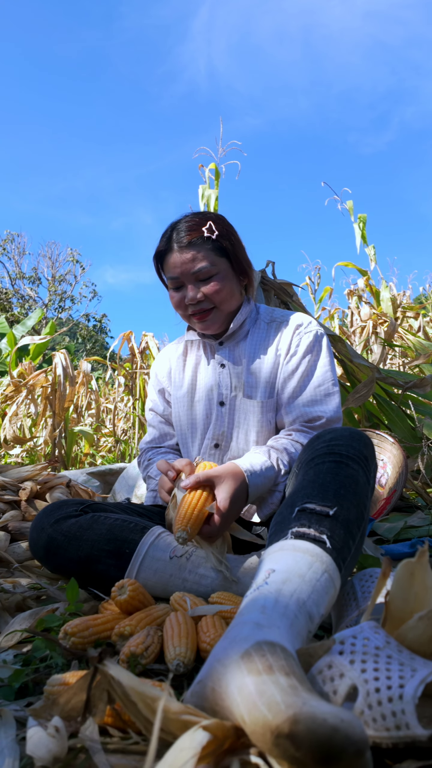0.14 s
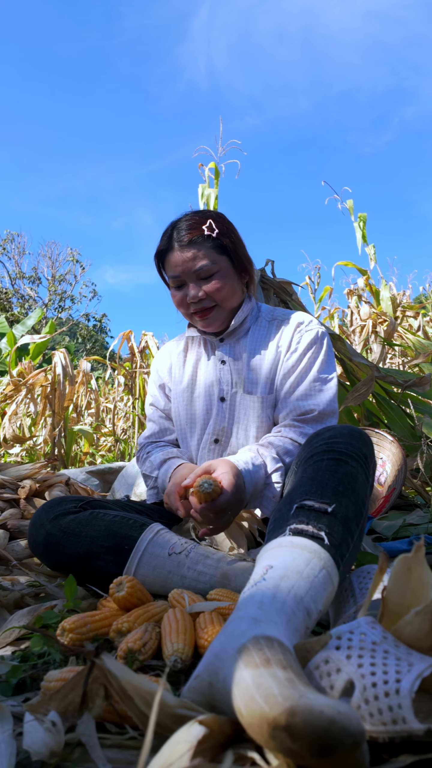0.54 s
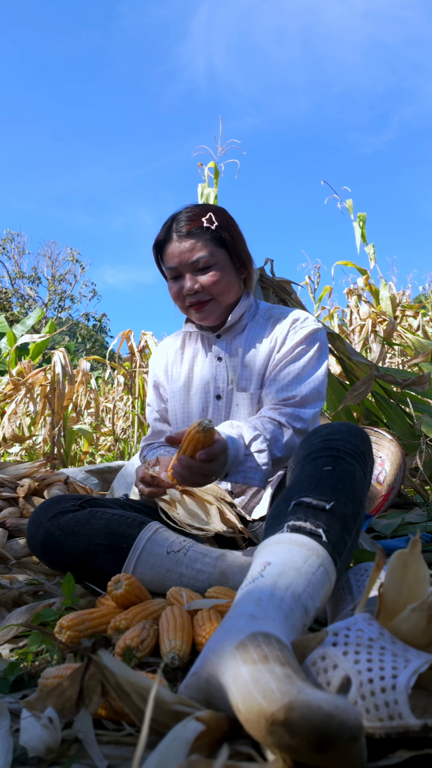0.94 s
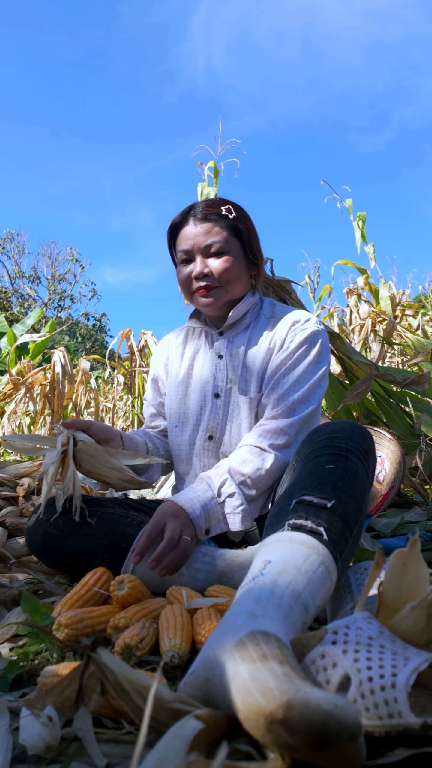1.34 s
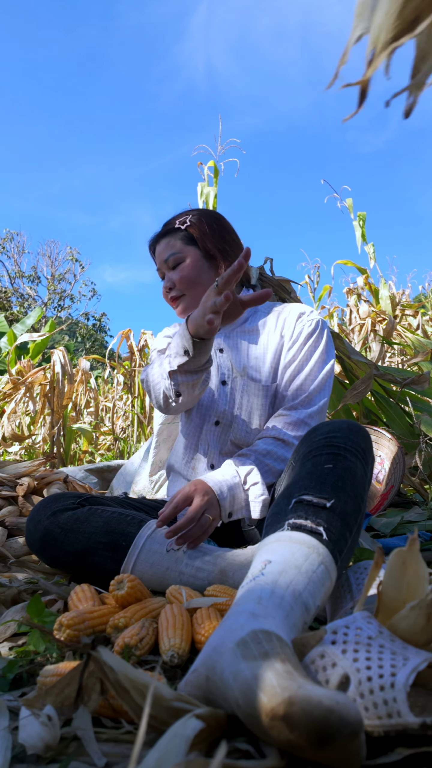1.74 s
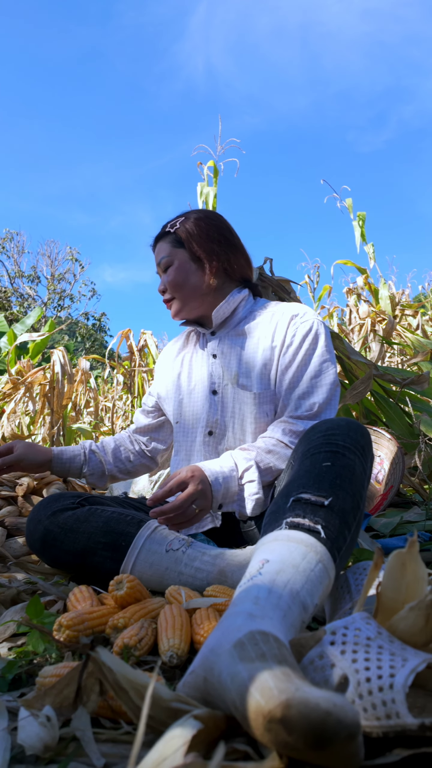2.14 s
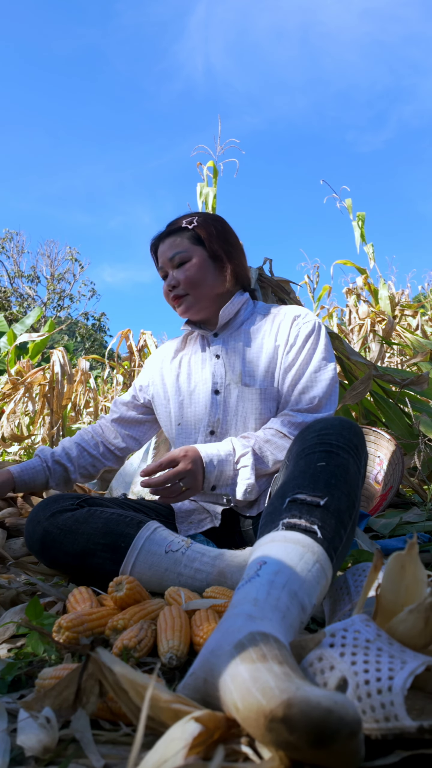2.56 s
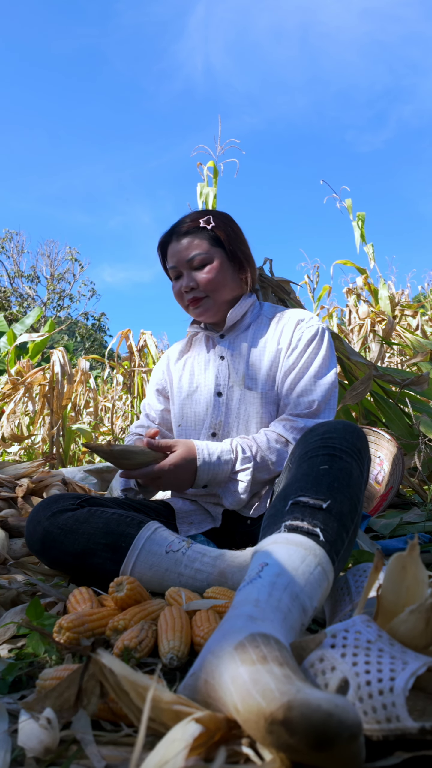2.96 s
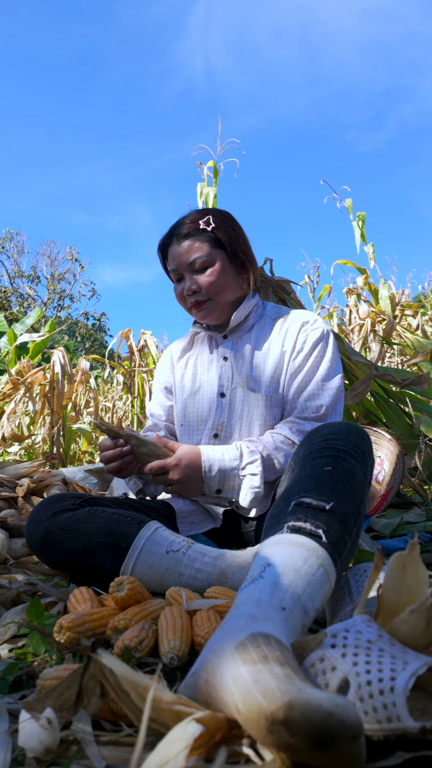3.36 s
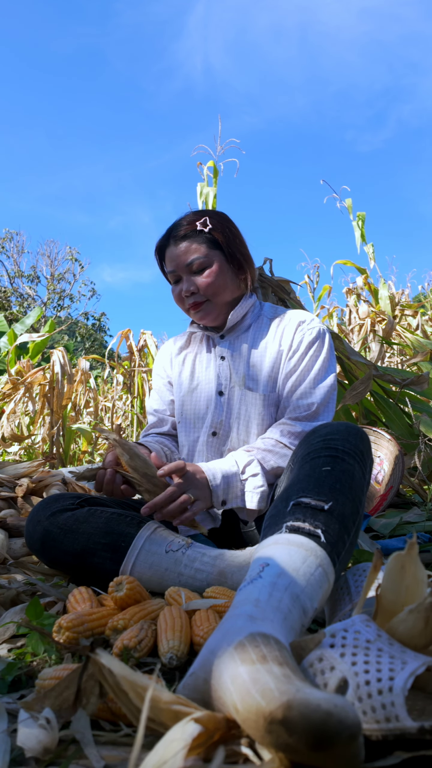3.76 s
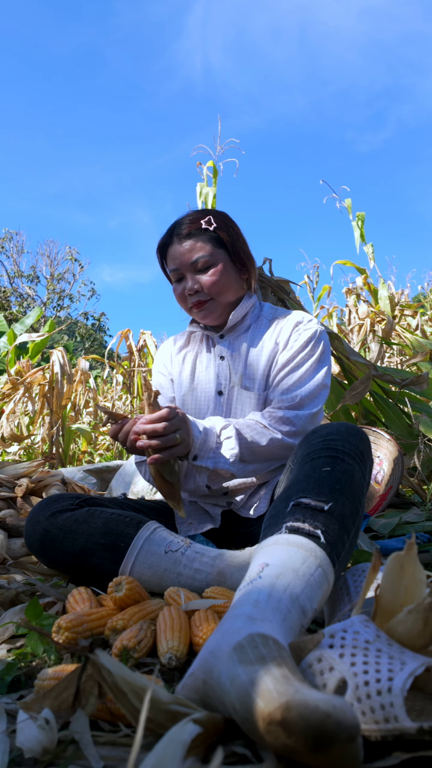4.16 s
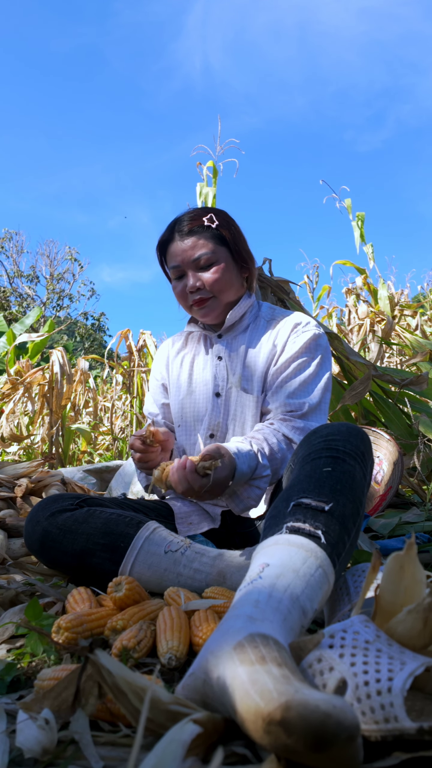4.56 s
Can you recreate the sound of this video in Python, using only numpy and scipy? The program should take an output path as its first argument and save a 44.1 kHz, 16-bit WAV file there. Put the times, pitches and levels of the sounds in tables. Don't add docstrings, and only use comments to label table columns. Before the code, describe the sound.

Hands strip papery leaves from corn ears outdoors, brittle crackles and sharp snaps over faint cricket chirps, airy hiss and distant low rumble.

```python
import sys
import numpy as np
from scipy import signal
from scipy.fft import rfft, irfft
from scipy.io import wavfile
from scipy.ndimage import uniform_filter1d

SR = 44100
rng = np.random.default_rng(int(sys.argv[2]) if len(sys.argv) > 2 else 0)


def dump(signal):
    limited = np.clip(np.atleast_2d(signal).T, -1, 1)
    pcm = np.round(limited * 32767).astype(np.int16)
    wavfile.write(sys.argv[1], SR, pcm)


def attenuation_scalar(level_db):
    decades = np.asarray(level_db, float) / 20
    return 10 ** decades


N = 207490

# peak_s, level_db, rise_s, fall_s, fine_fibres_db
GRIP_STROKES = [(0.002, -45, 0.023, 0.043, -2.5), (.07, -53, 0.092, 0.1, 1.5),
                (.122, -43.5, 0.012, 0.011, -2), (.145, -51, 0.02, 0.01, -3), (.22, -57, 0.046, 0.03, -0.5),
                (.345, -51, 0.1, 0.044, -2), (.443, -54.5, 0.0067, 0.15, -17), (.54, -56, 0.063, 0.77, -4),
                (.755, -51, 0.75, 0.018, -0.5), (.835, -64, .08, 0.026, -9),
                (.853, -42.5, 0.0047, 0.038, 4.5), (.877, -47, .008, .015, -10),
                (.901, -41.5, 0.018, .02, -5), (.92, -50, 0.013, 0.019, -3), (.955, -52.5, .08, 0.017, -1),
                (1.015, -55, 0.051, 0.06, 1.5), (1.169, -56, 0.01, 0.037, -21),
                (1.263, -59, 0.084, 0.19, 2), (1.305, -53, .004, 0.036, -9),
                (1.345, -56.5, 0.099, 0.12, 1.5), (1.385, -59, .02, 0.035, -3),
                (1.405, -55, 0.063, 0.018, -4), (1.578, -55.5, 0.021, 0.083, -1),
                (1.73, -56.5, 0.063, 0.099, 2.5), (1.52, -62.5, 0.027, 0.078, 2),
                (1.89, -63.5, 0.028, 0.1, 5.5), (3.695, -38, 0.037, 0.0099, 1), (3.71, -49, .02, .02, -1),
                (3.723, -46, .004, 0.035, -1), (3.75, -47.5, 0.066, 0.013, 4), (3.87, -59, 0.17, 0.026, 2),
                (4.21, -60.5, .02, 0.047, 6), (4.56, -57, 0.014, 0.033, 1.5)]
# peak_s, level_db, rise_s, fall_s, fine_fibres_db
TEAR_STROKES = [(1.365, -41.5, 0.019, 0.026, -5.5), (2.027, -38.5, 0.0013, 0.047, 4),
                (2.051, -38.5, 0.021, .011, -8), (2.075, -43, 0.025, .03, 1),
                (2.095, -35, 0.022, 0.077, -2), (2.122, -38, 0.0083, 0.036, -3.5),
                (2.15, -50, .03, 0.084, -3), (2.17, -57, 0.02, 0.3, 2), (2.2, -47.5, 0.04, 0.066, 3.5),
                (2.25, -46.5, 0.11, 0.066, 1), (2.47, -52, 0.1, 0.075, 2), (2.55, -63.5, 0.07, 0.15, 1),
                (2.69, -56.5, 0.024, 0.066, 11.5), (2.735, -65, 0.1, 0.016, 16.5),
                (2.828, -68, 0.03, 0.13, 9.5), (3.024, -66.5, 0.0059, 0.27, 3),
                (3.388, -69, 0.056, 0.011, 10), (3.432, -63, 0.018, 0.053, 6),
                (3.61, -62.5, 0.12, 0.035, 8.5), (3.659, -37, 0.002, 0.065, 4),
                (3.676, -26, 0.015, 0.0081, 8.5), (3.928, -49, 0.046, 0.041, 2),
                (4.044, -61.5, 0.08, 0.43, 1), (4.312, -47, 0.031, .011, 0),
                (4.326, -41.5, 0.0059, 0.096, 0.5), (4.355, -39.5, 0.025, 0.017, 3),
                (4.371, -35, 0.02, 0.031, 2.5), (4.386, -37, 0.014, .04, 1), (4.43, -43, 0.063, 0.027, 0),
                (4.452, -45, .02, 0.013, 2), (4.475, -45.5, 0.032, .03, -1), (4.502, -37, 0.025, 0.012, 0),
                (4.517, -37.5, 0.014, 0.021, 2), (4.537, -51, .006, 0.0096, 8),
                (4.704, -53.5, 0.032, .02, 4)]
# peak_s, level_db, rise_s, fall_s
FOLD_STROKES = [(.5, -58.5, 0.019, 0.023), (.92, -52, 0.037, 0.0098), (1.368, -56, 0.013, 0.012),
                (1.585, -66.5, .006, 0.097), (1.72, -64.5, 0.047, 0.065), (2.036, -44.5, 0.0069, 0.029),
                (2.31, -61.5, 0.059, 0.063), (2.43, -62, 0.012, 0.023), (4.312, -56, 0.039, 0.021)]
# peak_s, level_db, rise_s, fall_s
PRESS_STROKES = [(.124, -59, 0.0055, 0.022), (.35, -61, 0.013, 0.043), (.745, -71, 0.022, 0.032),
                 (.835, -57.5, 0.057, 0.012), (.862, -46.5, 0.012, 0.017), (.94, -54, 0.087, 0.033),
                 (1.31, -67, 0.0088, 0.051), (2.15, -56, 0.059, 0.12), (4.41, -54.5, 0.031, 0.029),
                 (4.49, -57, 0.013, 0.016), (4.522, -57, 0.008, 0.0049)]
# lowest_hz, highest_hz, ring_t60_s, cracks_per_s, size_spread_db, likeness_0_1
HUSK_PARTS = [
    (2270, 5200, 0.034, 3000, 1, 0.37),
    (975, 1785, 0.053, 2000, 0, 0.61),
    (7700, 15500, 0.0096, 9000, 0.3, 0.14),
    (208.7, 865, 0.063, 1600, 2, 0.89),
]
# folds_db, cob_db
GRIP_PARTS, TEAR_PARTS, FOLD_PARTS, PRESS_PARTS = (-10.5, -1.6), (-7, -15), (7.5, 0.62), (0, 10.7)
STROKE_DB = 12
REST_DB = -79

# start_s, peak_db, ring_hz, fine_fibres_db
LEAF_SNAPS = [(0.317, -28, 2680, -18), (.4426, -26, 2400, -16), (1.266, -31.5, 3040, -16),
              (1.302, -29.5, 5300, -6), (1.3565, -28, 3690, -1), (2.0233, -20, 3630, -6),
              (2.0234, -25, 960, -25), (2.1194, -19, 1230, -3), (2.1203, -25, 2570, 11),
              (3.028, -37, 2130, 1.5), (3.382, -43.5, 2200, -29), (3.4426, -43.5, 4800, -18),
              (3.5447, -42, 4780, -1), (3.6072, -46.5, 1830, 20.5), (3.657, -16, 2310, -19),
              (3.6722, -3.5, 2080, -25), (3.6743, -2, 4860, -19), (3.6806, -12, 4750, -24),
              (3.72, -31.5, 4220, 5), (3.919, -29, 2100, -8), (3.9304, -26, 3850, 2),
              (4.0683, -39, 4460, 4), (4.146, -37, 2900, -26), (4.3091, -20, 1680, -7),
              (4.3223, -31, 1770, -4), (4.3383, -24, 1600, -11), (4.382, -22, 4200, 0),
              (4.3875, -19, 2300, -16), (4.502, -27, 2650, -16), (4.534, -30, 4800, 10)]
# start_s, peak_db, ring_hz, cob_db
COB_KNOCKS = [(.009, -33, 4320, -17), (0.142, -28.5, 4020, -11), (0.2042, -32, 2250, -21),
              (0.34, -30, 2770, -21), (0.6123, -41.5, 3280, 9), (0.65, -29, 4470, -2.5),
              (0.752, -31, 4360, -1), (0.851, -25, 2520, 4), (0.8533, -14, 2780, -24),
              (0.8604, -15.5, 2880, -19), (0.9002, -23.5, 3250, -4), (1.052, -48, 3170, -17),
              (1.169, -37, 3220, -20), (1.3611, -22.5, 3300, -23), (1.3659, -26, 1660, -4.5),
              (1.5779, -33, 3360, -3), (1.5854, -49, 900, -3), (3.6673, -7, 2240, -11),
              (3.8765, -30, 1670, -6), (4.0376, -48, 2730, 1), (4.7034, -31.5, 4670, 2.5)]
# start_s, peak_db, ring_hz
EDGE_SPLINTERS = [(0.1199, -31, 3900), (.4942, -34, 3500), (.588, -35, 4630), (.816, -34, 3160),
                  (0.8303, -40.5, 4290), (0.8542, -21.5, 2960), (1.3147, -33.5, 3250), (4.5201, -23, 3020)]
SNAP_COB_DB, KNOCK_FINE_DB, SPLINTER_FINE_DB, SPLINTER_COB_DB = -31, -9, 1, -7
# start_s, peak_db, centre_hz
FIBRE_TICKS = [(.041, -40.5, 3550), (0.573, -45, 4000), (.6128, -43, 8000), (.748, -46, 9000),
               (0.851, -32, 10000), (.862, -26, 9900), (0.967, -46, 3000), (1.015, -51, 3500),
               (1.282, -46, 3500), (1.708, -52.5, 3000), (2.028, -30, 10000), (2.2925, -45, 9000),
               (3.6435, -50, 2500), (3.6589, -26, 4500), (3.6686, -15, 9500), (3.891, -40, 4800),
               (3.9093, -41, 8000), (4.3235, -40, 8000), (4.3252, -29, 3000), (4.365, -31.5, 4500),
               (4.51, -33, 4530), (4.476, -40, 3020), (4.55, -48, 2500)]
# start_s, peak_db, pitch_hz, t60_s
STRUCK_POCKETS = [(.119, -39, 790, 0.062), (0.1202, -40, 3660, .02), (.143, -40, 770, 0.049),
                  (.25, -43, 330, 0.074), (.35, -58, 560, 0.052), (.591, -49, 670, 0.054),
                  (.613, -35, 427, 0.063), (.635, -42, 654, 0.045), (.741, -40, 647, 0.064),
                  (.831, -47, 649, 0.064), (.851, -36, 408, 0.068), (.862, -33, 697, .05),
                  (.875, -35, 2300, 0.019), (.898, -42, 674, 0.066), (.918, -36.5, 464, 0.13),
                  (.918, -40, 1530, 0.03), (.94, -40, 626, 0.063), (1.303, -50, 1670, .03),
                  (1.318, -37, 980, 0.048), (1.318, -36.5, 410, 0.047), (1.363, -38, 1110, 0.051),
                  (1.387, -48, 470, 0.1), (1.578, -41, 940, 0.07), (1.58, -47.5, 700, 0.068),
                  (2.0249, -38, 1090, 0.02), (2.033, -33, 1000, 0.035), (2.046, -43, 1300, .03),
                  (2.087, -32, 2600, .02), (2.152, -37, 635, 0.066), (2.2, -37, 1740, 0.035),
                  (2.228, -43, 1280, 0.032), (2.06, -55, 490, 0.055), (2.29, -48.5, 750, 0.065),
                  (3.6733, -28, 2100, 0.007), (3.6752, -18, 2400, 0.0068), (3.908, -46, 2040, .02),
                  (3.7205, -44, 3000, 0.011), (3.877, -42, 466, .05), (3.914, -43, 433, 0.084),
                  (4.037, -50, 2230, 0.014), (4.3099, -29.5, 1630, .025), (4.3392, -32, 1580, 0.028),
                  (4.352, -48, 634, 0.052), (4.376, -39, 463, 0.08), (4.3855, -31, 3200, 0.0091),
                  (4.403, -35, 2290, 0.028), (4.425, -47, 433, 0.048), (4.499, -48, 620, 0.041),
                  (4.503, -36, 2720, 0.017), (4.52, -38, 707, 0.045),
                  (1.357, -35, 3020, 0.0074), (1.588, -43, 6340, 0.0087), (2.434, -40, 2510, .012),
            (3.178, -54.5, 1990, 0.018), (3.344, -54, 2240, 0.027), (3.43, -54, 1980, 0.014),
            (3.556, -53, 5040, .012), (4.558, -54, 4330, 0.04)]
# start_s, length_s, first_hz, last_hz, level_db
LEAF_SQUEAKS = [(0.247, 0.087, 1883, 1985, -55.5), (0.309, 0.13, 1860, 2040, -63.5),
                (1.169, 0.018, 685, 644, -49), (2.19, .25, 1230, 1250, -63.5),
                (2.567, 0.15, 950, 820, -51.5), (2.649, 0.046, 1070, 1060, -50.5),
                (2.588, 0.077, 2230, 2280, -67), (2.813, 0.07, 1130, 1226, -59.5),
                (3.784, 0.029, 1440, 1440, -66), (3.808, 0.049, 1580, 1680, -66),
                (3.85, 0.031, 1720, 1860, -60)]
# start_s, length_s, first_hz, last_hz, level_db
FOLD_CREAKS = [(.29, 0.077, 1900, 2010, -67.5), (.62, 0.086, 600, 646, -57),
               (1.585, 0.038, 1490, 1500, -73), (2.026, 0.034, 950, 1280, -49), (2.13, 0.17, 650, 780, -61),
               (2.18, 0.13, 1610, 1310, -54), (4.34, .11, 2030, 2360, -50), (2.57, 0.099, 1000, 950, -65),
               (2.44, 0.068, 3280, 3500, -53), (3.595, 0.028, 1900, 1950, -66),
               (3.685, 0.058, 620, 596, -52.5), (3.7, 0.064, 1530, 1800, -51.5),
               (3.78, .035, 1480, 1510, -63), (3.865, 0.021, 1700, 1760, -57),
               (3.9, 0.046, 1680, 2210, -59), (3.9, 0.097, 446, 400, -59), (4.47, 0.058, 620, 656, -53),
               (4.49, 0.045, 1900, 1700, -47.5)]
SQUEAK_WIDTH_HZ, CREAK_WIDTH_HZ = 89, 300

# start_s, left_minus_right_db, left_lead_samples, ground_colour_depth_0_1
HUSK_PLACE = [(0, 2.5, 2, 0.28), (1.968, 2, -2, 0.47), (2.01, -3, -4.5, 0.01), (2.52, -1, -5, 0.06),
              (2.62, 3.5, 1.5, 0.52), (3.6, 2, 1.5, 0.6), (4.71, 1, 1.5, 0.36)]
# frequency_hz, phase_rad_per_sample_of_lead
PORT_PHASE = [(250, 0), (800, 0.4), (1600, 0.05)]
# frequency_hz, gain_db
GROUND_COLOUR = [(200, -17.5), (350, 2), (515, -24), (690, -9.5), (920, -42), (1150, -17.5), (1600, -1.5),
                 (2300, -2), (4700, 0), (6500, -8), (9500, -5), (15500, -6.5)]
# start_s, peak_db, pitch_hz
HEAP_THUMPS = [(0.616, -39, 164), (1.3, -44, 90), (1.316, -36.5, 152), (1.384, -44, 110.7),
               (2.161, -46, 92), (2.219, -36, 98), (4.515, -36.5, 92)]

CHIRP_START_S, CHIRP_PERIOD_S, CHIRP_HZ, CHIRP_DB = .033, .1862, 8340, -61.5
TRILL_HZ = 4750
# time_s, level_db
TRILL_LEVEL = [(0, -69), (1.5, -74.5), (2.8, -71), (3.2, -71), (3.6, -75), (4.2, -73), (4.71, -74)]
# frequency_hz, density_db_per_hz
AIR_SPECTRUM = [(37, -46), (54, -4), (108, 5), (126, -2.5), (145, 10), (172, -4.5), (236, -10), (365, -25),
                (750, -33), (2200, -36.5), (4000, -44), (6000, -42.5), (9500, -43.5), (16000, -53)]
# time_s, level_db
RUMBLE_LEVEL = [(0.0, -50.5), (0.789, -48.5), (1.01, -55), (1.061, -47.5), (1.18, -53), (1.39, -42),
                (1.56, -55.5), (1.578, -48.5), (2.65, -47.5), (2.86, -50), (2.96, -47.5), (4.14, -48),
                (4.22, -45.5), (4.402, -50.5), (4.52, -45.5), (4.7, -46)]
# time_s, gain_db
BREEZE_LEVEL = [(2.85, 2), (2.96, 0.5), (3.06, 3), (3.27, -0.5), (3.36, 1), (4.5, 1), (4.62, -0.5),
                (4.69, -1)]
# frequency_hz, likeness_0_1
AIR_LIKENESS = [(50, 1), (250, 1), (700, 0.28), (2000, 0.039), (5000, 0.026), (15000, 0.1)]
# frequency_hz, lead_rad
AIR_PHASE = [(50, 0), (250, 0.55), (2000, 1), (15000, 0.096)]
# frequency_hz, gain_db
MIC_RESPONSE = [(30, -10), (45, -42), (60, -2), (15600, -1.5), (15900, -16), (16500, -34)]


def evened(x):
    return x / np.sqrt(np.mean(x ** 2) + 1e-20)


def read(points, hz):
    f, value = np.transpose(points)
    return np.interp(np.log(hz + 1), np.log(f + 1), value)


def add(mix, s, sound):
    part = mix[..., round(s * SR):][..., :sound.shape[-1]]
    part += sound[..., :part.shape[-1]]


def resonate(x, hz, width):
    turn = np.exp(2j * np.pi * np.cumsum(hz * np.ones(x.shape[-1])) / SR)
    r = np.exp(-np.pi * width / SR)
    envelope = signal.lfilter([1 - r], [1, -r], x / turn + 1e-18)
    return 2 * (turn * envelope).real


def drift(per_s):
    span = max(round(SR / per_s), 1)
    smooth = uniform_filter1d(rng.standard_normal(N), span)
    return evened(uniform_filter1d(smooth, span))


def crack(noise, hz, width, t60, same, click):
    pair = np.array([noise[0], same * noise[0] + np.sqrt(1 - same ** 2) * noise[1]])
    t = np.arange(pair.shape[1]) / SR
    burst = pair * attenuation_scalar(-60 * t / t60) + click * (t == 0)
    ring = resonate(resonate(burst, hz, width), hz, width)
    return ring / abs(ring).max(1, keepdims=True)


def crackle():
    kinds = [(GRIP_STROKES, GRIP_PARTS), (TEAR_STROKES, TEAR_PARTS),
             (FOLD_STROKES, FOLD_PARTS), (PRESS_STROKES, PRESS_PARTS)]
    power = sum(strokes(rows, *parts_db) for rows, parts_db in kinds)
    levels = np.sqrt(power + attenuation_scalar(2 * REST_DB))
    s = np.arange(levels.shape[1]) * 64 / SR
    t, out = np.arange(N) / SR, np.zeros((2, N))
    clumps_db = np.minimum(.8 * drift(40) + 2.4 * drift(220), 3.2)
    bending = drift(18)
    held_gain = attenuation_scalar(-5 * strain())
    for (low, high, t60, per_s, spread_db, same), level in zip(HUSK_PARTS, levels):
        size_db = spread_db * np.minimum(rng.exponential(1, N), 4) + clumps_db
        size = attenuation_scalar(size_db) * (rng.random(N) < per_s / SR)
        patch, layer = rng.integers(0, 13, N), np.zeros((2, N))
        for k, hz in enumerate(np.geomspace(low, high, num=13)):
            ring = crack(rng.standard_normal((2, 1800)), hz, 0.49 * hz, t60, same, 0.28)
            ring *= np.sqrt(hz) / np.linalg.norm(ring, axis=1, keepdims=True)
            wander = attenuation_scalar(3.4 * np.roll(bending, rng.integers(N)))
            hits = size * wander * (patch == k)
            layer += signal.oaconvolve(hits[None], ring, axes=1)[:, :N]
        out += evened(layer) * np.interp(t, s, level) * held_gain
    return out


def strokes(rows, folds_db, cob_db):
    t, power = np.arange(0, N + 64, 64) / SR, 0
    for s, peak_db, rise, fall, *fine_db in rows:
        away = np.maximum((s - t) / max(rise, .001), (t - s) / max(fall, .001))
        away = away + np.maximum(away - 1, 0)
        parts_db = np.array([[0], [folds_db], [sum(fine_db)], [cob_db]])
        power = power + attenuation_scalar(2 * (peak_db - STROKE_DB * away + parts_db))
    return power


def strain():
    marks = np.zeros(N)
    starts = np.array(breaks())[:, 0]
    marks[np.round(starts * SR).astype(int)] = 1
    held = signal.oaconvolve(marks[::-1], np.hanning(700)[350:])[:N][::-1]
    return np.minimum(held, 1)


def breaks():
    free = [(*row, SNAP_COB_DB) for row in LEAF_SNAPS]
    knocks = [(s, db, hz, KNOCK_FINE_DB, cob_db) for s, db, hz, cob_db in COB_KNOCKS]
    splinters = [(*row, SPLINTER_FINE_DB, SPLINTER_COB_DB) for row in EDGE_SPLINTERS]
    return sorted(free + knocks + splinters)


def snaps():
    out, rows = np.zeros((2, N)), breaks()
    noises = rng.standard_normal((len(rows), 4, 2, 1500))
    bounces = rng.random((len(rows), 2))
    for (s, peak_db, hz, fine_db, cob_db), noise, bounce in zip(rows, noises, bounces):
        leaf = .8 * crack(noise[0], hz, 1300, .012, .85, 9)
        leaf += .4 * crack(noise[1], 3600, 5000, .012, .8, 2.5)
        fine = attenuation_scalar(fine_db + 2) * crack(noise[2], 11500, 9000, .014, .55, 1.5)
        cob = attenuation_scalar(cob_db) * crack(noise[3], 380 + 360 * bounce[1], 480, .03, .97, 8)
        sound = attenuation_scalar(peak_db - 6.5) * (leaf + fine + cob)
        add(out, s + 0.001125, sound)
        add(out, s + .0036 + .0008 * bounce[0], -attenuation_scalar(-10) * sound)
    return out


def ticks():
    out = np.zeros((2, N))
    for s, peak_db, hz in FIBRE_TICKS:
        noise = rng.standard_normal((2, 600))
        add(out, s, attenuation_scalar(peak_db) * crack(noise, hz, .75 * hz, .012, .7, 3))
    return out


def pockets():
    out, t = np.zeros((2, N)), np.arange(3500) / SR
    for s, peak_db, hz, t60 in STRUCK_POCKETS:
        note = np.sin(2 * np.pi * hz * t) + 0.19 * np.sin(2 * np.pi * 1.6 * hz * t)
        onset = 1 - np.exp(-t * hz / 0.73)
        add(out, s, attenuation_scalar(peak_db - 60 * t / t60) * onset * note)
    return out


def squeaks(rows, width_hz):
    out = np.zeros((2, N))
    for s, length, first_hz, last_hz, db in rows:
        span = round(length * SR)
        hz = np.r_[np.full(2000, first_hz), np.linspace(first_hz, last_hz, span)]
        noise = rng.standard_normal(len(hz))
        note = resonate(resonate(noise, hz, width_hz), hz, width_hz)[-span:]
        add(out, s, attenuation_scalar(db) * evened(note) * signal.windows.tukey(span, .6))
    return out


def placed(x):
    hz, t, z = signal.stft(x, SR, nperseg=256)
    s, pan_db, lead, depth = np.transpose(HUSK_PLACE)
    phase = (np.pi * hz / SR + read(PORT_PHASE, hz) / 2)[:, None] * np.interp(t, s, lead)
    half = attenuation_scalar(np.interp(t, s, pan_db) / 2) * np.exp(1j * phase)
    colour = attenuation_scalar(read(GROUND_COLOUR, hz)[:, None] * np.interp(t, s, depth))
    z = z * np.array([half, 1 / half]) * colour
    return signal.istft(z, SR, nperseg=256)[1][:, :N]


def thumps():
    out, t = np.zeros((2, N)), np.arange(4000) / SR
    for s, peak_db, hz in HEAP_THUMPS:
        envelope = attenuation_scalar(peak_db - 60 * t / .13) * (1 - np.exp(-t / .004))
        add(out, s, envelope * np.sin(2 * np.pi * hz * t))
    return out


def chirps():
    out, t = np.zeros(N), np.arange(1250) / SR
    hz = CHIRP_HZ * (1 - .03 * np.clip((t - .021) / .004, 0, 1))
    shape = np.interp(t, [0, .008, .021, .0225, .025, .028], [0, .85, 1, .3, .6, 0])
    stroke = shape * np.sin(2 * np.pi * np.cumsum(hz) / SR)
    for s in CHIRP_START_S + CHIRP_PERIOD_S * np.arange(25):
        for gap in (0, .0425):
            late, db = rng.standard_normal(2)
            add(out, s + gap + 0.0014 * late, attenuation_scalar(CHIRP_DB + 0.5 * db) * stroke)
    fade = attenuation_scalar(-60 * np.arange(5000) / SR / 0.2)
    echo = resonate(rng.standard_normal((2, 5000)), CHIRP_HZ, 400) * fade
    tail = signal.oaconvolve(out[None], echo, axes=1)[:, :N]
    return out * attenuation_scalar([[-2], [2]]) + attenuation_scalar(-8) * tail * np.std(out) / np.std(tail)


def trill():
    t = np.arange(N) / SR
    throb = 5.1 + np.sin(2 * np.pi * np.cumsum(38 + 4.9 * drift(5.7)) / SR)
    hz = TRILL_HZ + 25 * drift(9.4)
    note = resonate(resonate(rng.standard_normal((2, N)), hz, 210), hz, 210) * throb
    level_db = np.interp(t, *np.transpose(TRILL_LEVEL)) + 2.7 * drift(13)
    return evened(note) * attenuation_scalar(level_db)


def air():
    frames, hz = N // 256 + 5, np.fft.rfftfreq(1024, 1 / SR)
    a, b, c, d, patches = rng.standard_normal((frames, 513, 5)).T
    patches = evened(uniform_filter1d(uniform_filter1d(patches, 10, 0), 12, 1))
    same = np.clip(read(AIR_LIKENESS, hz), -1, 1)[:, None]
    left = a + 1j * b
    shared = same * left * np.exp(-1j * read(AIR_PHASE, hz))[:, None]
    right = shared + np.sqrt(1 - same ** 2) * (c + 1j * d)
    t = np.arange(frames) * 256 / SR
    s, db = np.transpose(RUMBLE_LEVEL)
    swell_db = np.interp(t, s, db - db.mean())
    breeze_db = np.interp(t, *np.transpose(BREEZE_LEVEL))
    low = 1 / (1 + (hz[:, None] / 350) ** 4)
    z = np.array([left * attenuation_scalar(0.5 * (2 - low)), right])
    z *= attenuation_scalar(read(AIR_SPECTRUM, hz)[:, None] + (0.47 * patches + breeze_db) * (2 - low) + low * swell_db)
    steady = np.sqrt(np.mean(attenuation_scalar(2 * swell_db)))
    noise = signal.istft(z, nperseg=1024, noverlap=768)[1][:, :N]
    return attenuation_scalar(db.mean()) * steady * evened(noise)


def scene():
    husks = crackle() + snaps() + ticks() + pockets()
    husks += squeaks(LEAF_SQUEAKS, SQUEAK_WIDTH_HZ) + squeaks(FOLD_CREAKS, CREAK_WIDTH_HZ)
    return placed(husks) + thumps() + chirps() + trill() + air()


def top_cut(x):
    return signal.sosfilt(signal.butter(12, 16640, fs=SR, output="sos"), x)


def record(dry):
    hz = np.fft.rfftfreq(N, 1 / SR)
    heard = irfft(rfft(dry) * attenuation_scalar(read(MIC_RESPONSE, hz)), N)
    return top_cut(heard)


dry = scene()
out = record(dry)
dump(out)
```